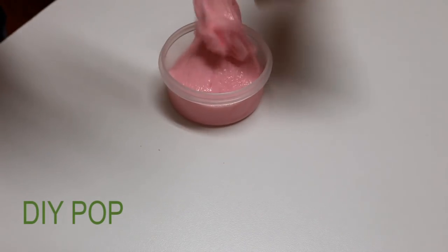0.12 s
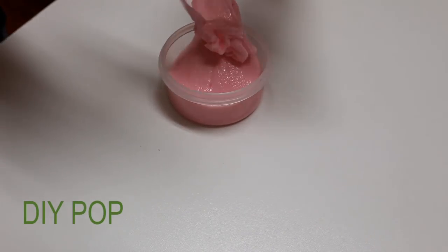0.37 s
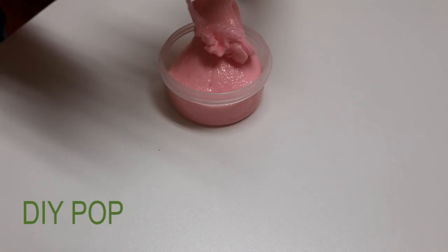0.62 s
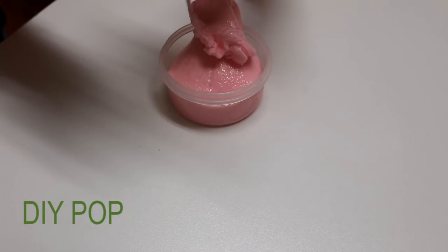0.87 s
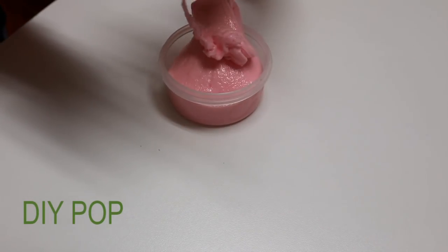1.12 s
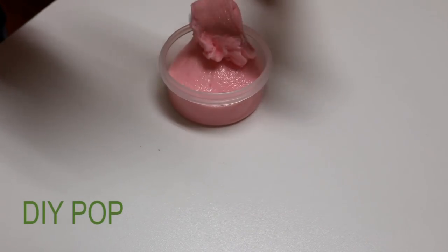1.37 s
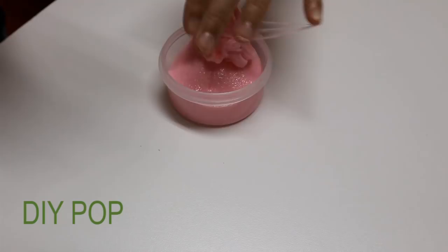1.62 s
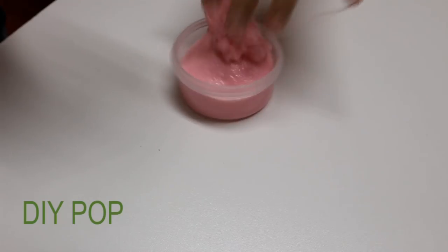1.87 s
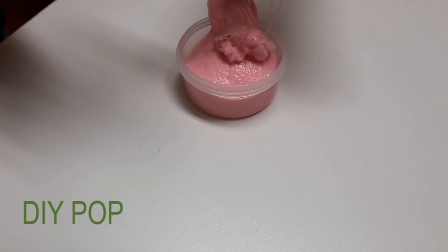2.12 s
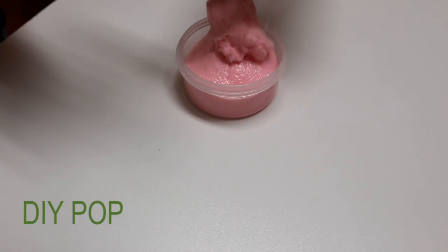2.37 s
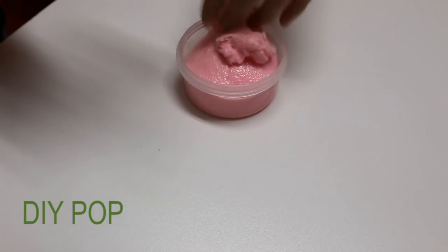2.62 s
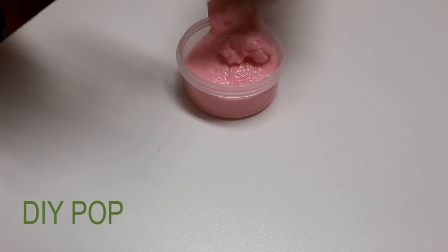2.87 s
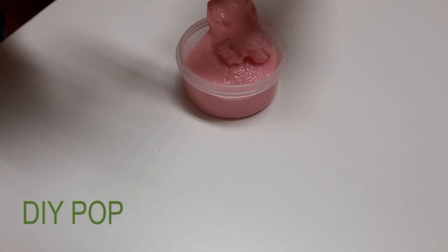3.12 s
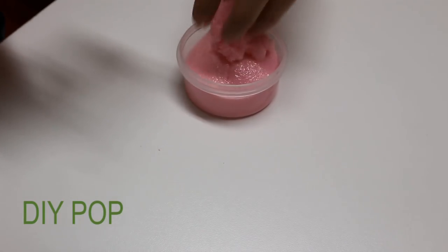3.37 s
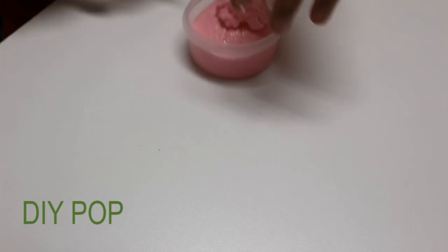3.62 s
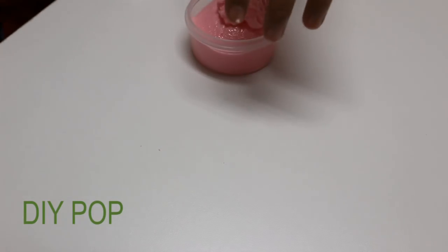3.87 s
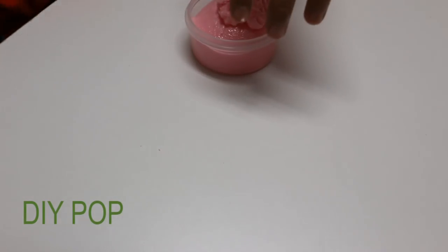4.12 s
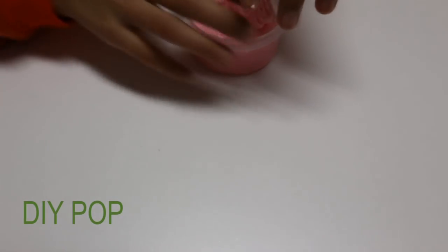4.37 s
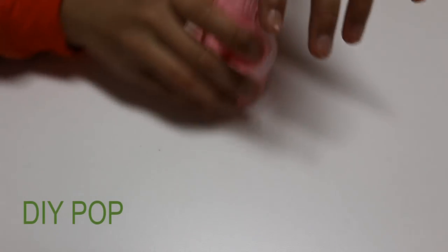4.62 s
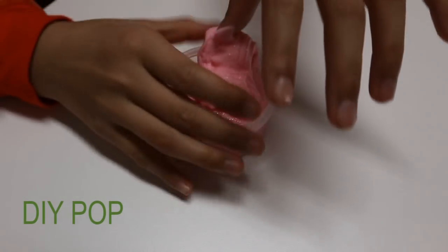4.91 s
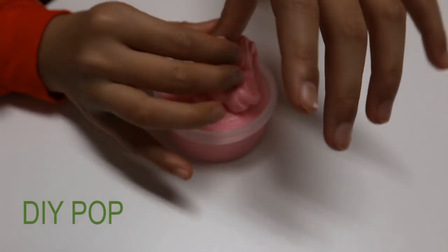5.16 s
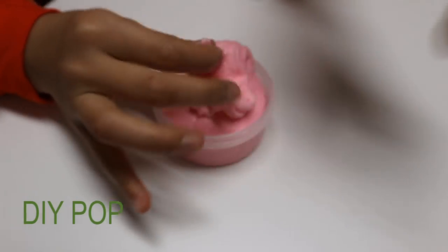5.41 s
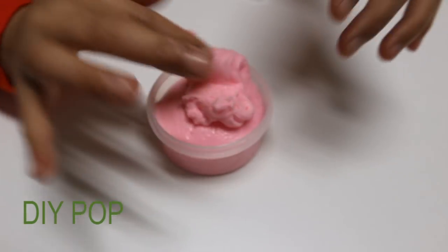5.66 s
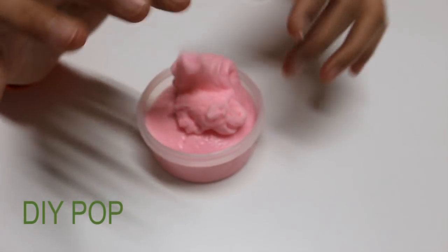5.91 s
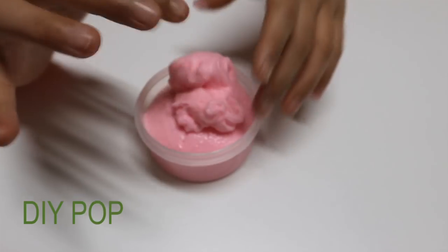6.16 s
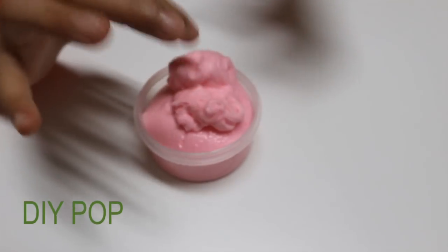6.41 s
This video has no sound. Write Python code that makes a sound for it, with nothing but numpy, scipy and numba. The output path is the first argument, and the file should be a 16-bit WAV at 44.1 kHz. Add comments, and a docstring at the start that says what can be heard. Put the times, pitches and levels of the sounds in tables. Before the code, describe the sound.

Soft slime clicks and little air-pocket pops come in loose clusters, with brief airy squeaks. One sharp plastic thud on a hard table stands out, then near quiet. A gritty drag leads into the loudest moment, fat hollow pops within a stuttering creak that slows into single slips. More scraping and bumps follow, then light sticky pops. Close dry stereo pickup, small quiet room, low hum.

```python
"""Fingers knead fluffy slime in a plastic tub on a hard table, close to a small stereo microphone.
Pops are film snaps with ringing air pockets; sticky films are dense bright clicks, squeaks ringing noise.
The tub knocks and slides on the table as grit and blows ring its modes, and once judders with a creak.
A quiet room hums behind: coloured noise, narrow wavering bands and a distant low rumble."""
import sys
import numpy as np
from scipy import signal
from scipy.fft import rfft, irfft, next_fast_len
from scipy.io import wavfile
from scipy.ndimage import uniform_filter1d
from numba import njit

SR = 44100
rng = np.random.default_rng(int(sys.argv[2]) if len(sys.argv) > 2 else 0)


def voltage_ratio(level):
    """Linear amplitude factor for a level in decibels (scalar or array-like)."""
    return 10 ** (np.asarray(level, float) / 20)


def put_to_file(sound):
    """Save the sound as 16-bit audio at rate SR, in the file named by the first command-line argument."""
    columns = np.atleast_2d(sound).T  # one column per channel
    safe = np.clip(columns, -1, 1)
    whole_steps = np.round(safe * 32767)
    wavfile.write(sys.argv[1], SR, whole_steps.astype(np.int16))


N = 287532
T = np.arange(N) / SR
SIZE = next_fast_len(N)  # FFT length

# Resonances of the tub's walls and air. Each row: frequency in Hz, width in Hz, level in dB.
TUB_MODES = [(660, 58, -0.5), (586, 140, -12), (814, 110, -7.5)]
# Resonances of the table top. Each row: frequency in Hz, width in Hz, level in dB.
TABLE_MODES = [(130, 170, -19), (255, 30, -3.5), (419, 130, 3), (472, 110, 1.5)]
# Spectrum of fine crackle. Each row: frequency in Hz, level in dB.
CRACKLE_SPECTRUM = [(2350, -35), (4000, -7), (4190, -13), (5630, 0.5), (8310, -5.5), (13000, -17),
                    (14500, -23), (16000, -29.5)]


def unit(x):
    """Scale to rms 1."""
    return x / np.sqrt(np.mean(x ** 2))


def on_hz(table):
    """A (Hz, value) table on the FFT bins, interpolated along log frequency."""
    hz, value = np.transpose(table)
    bins_hz = np.fft.rfftfreq(SIZE, 1 / SR)
    return np.interp(np.log(bins_hz + 1), np.log(hz + 1), value)


def shape(x, table):
    """Filter a sound by a (Hz, dB) table."""
    return irfft(rfft(x, SIZE) * voltage_ratio(on_hz(table)), SIZE)[:N]


def colour(x, table):
    """Filter a sound by a (Hz, dB) table and bring it to rms 1."""
    return unit(shape(x, table))


def soft(x, hz):
    """A soft contact: the sound rolls off above hz."""
    return signal.sosfilt(signal.butter(2, hz, fs=SR, output="sos"), x)


def above(x, hz):
    """Roll off what lies below hz."""
    return signal.sosfilt(signal.butter(3, hz, "high", fs=SR, output="sos"), x)


def ring(x, modes):
    """Excite a body's modes: a sum of two-pole resonances."""
    return sum(voltage_ratio(db) * signal.lfilter(*signal.iirpeak(hz, hz / width, SR), x) for hz, width, db in modes)


@njit
def moving_band(x, hz, width):
    """State-variable band-pass whose centre moves."""
    y, band, low = np.empty(len(x)), 0., 0.
    for i in range(len(x)):
        g, k = np.tan(np.pi * hz[i] / SR), width / hz[i]
        v = (band + g * (x[i] - low)) / (1 + g * (g + k))
        band, low, y[i] = 2 * v - band, low + 2 * g * v, k * v
    return y


def grit(rate, scatter_db):
    """Dense tiny slips: random clicks, rate per second, some larger than the rest."""
    chance = rng.random((3, N))
    size_db = np.minimum(-scatter_db * np.log(1 - chance[1]), 14)
    return (chance[0] < rate / SR) * voltage_ratio(size_db) * np.sign(chance[2] - .5)


def walk(hz):
    """Random levels held 1 / hz s and slewed twice; rms 1."""
    k = int(SR / hz)
    held = np.repeat(rng.standard_normal(N // k + 1), k)[:N]
    return unit(uniform_filter1d(uniform_filter1d(held, k), k))


def columns(rows):
    """Curve columns on the sample grid; the first column is time in seconds."""
    s, *values = np.transpose(rows)
    return [np.interp(T, s, c) for c in values]


def moving(rows, edge_s=0.011):
    """1 while a motion lasts, easing in and out."""
    on = (T > rows[0][0] - edge_s) & (T < rows[-1][0] + edge_s)
    return uniform_filter1d(on.astype(float), size=600)


def swell(s, db, rise_s, fade_s):
    """Gain that climbs to a peak and fades, straight in decibels: 20 dB per rise_s or fade_s."""
    return voltage_ratio(db - 20 * np.where(T < s, (s - T) / rise_s, (T - s) / fade_s))


def strikes(times, db):
    """One impulse per event."""
    x = np.zeros(N)
    np.add.at(x, (np.asarray(times) * SR).astype(int), voltage_ratio(db))
    return x


def struck(times, db, modes, soft_hz):
    """Soft blows ring a body's modes, each blow scaled to its peak level."""
    one = soft(soft(ring(signal.unit_impulse(2000), modes), soft_hz), soft_hz)
    return signal.oaconvolve(strikes(times, db), one / np.abs(one).max())[:N]


def bursts(times, db, fade_s):
    """A short, exponentially fading puff of noise per event."""
    fade = np.exp(-T[:1000] / fade_s)
    rough = rng.standard_normal((len(times), 1000)) * fade * voltage_ratio(db)[:, None]
    x = np.zeros(N)
    np.add.at(x, (times[:, None] * SR).astype(int) + np.arange(1000), rough)
    return x


def pops():
    """A film snaps and the opened pocket rings roughly for a few cycles, rising as it shrinks."""
    # Each row: start in seconds, pocket peak in dB, pocket pitch in Hz,
    # snap level in dB against the pocket before colouring, pocket 60 dB decay in seconds.
    pop_rows = [(0.1435, -40.5, 1780, -13, 0.013), (0.1735, -46, 1920, -27, 0.018),
                (0.6493, -59, 1770, 1, 0.018), (0.6604, -54, 3220, -14, 0.022),
                (0.6774, -59, 1820, -9, 0.02), (0.6898, -51, 1310, -13, 0.02),
                (0.7465, -36, 1287, -17, 0.039), (0.8875, -42, 2190, -12.5, 0.011),
                (0.9203, -46.5, 2330, -24, 0.02), (1.157, -31.5, 1300, -18, 0.011),
                (1.181, -31, 1374, -21, 0.026), (1.2484, -50, 1380, -14, 0.023),
                (1.2767, -40, 1200, -22, 0.022), (1.282, -38, 1213, -14, 0.049),
                (1.287, -32.5, 1370, -28, 0.028), (1.3863, -42, 1300, -26, 0.022),
                (1.418, -40, 2690, -12, 0.025), (1.4232, -29.5, 2040, -18, 0.01),
                (1.469, -32.5, 1330, -24, 0.016), (1.493, -44, 1350, -19, 0.026),
                (1.725, -49.5, 2910, -9, 0.013), (1.7584, -48, 2900, -12.5, 0.016),
                (2.383, -49, 2250, -21, 0.025), (2.6494, -45.5, 2224, -21, 0.012),
                (2.7297, -42.5, 2310, -19, 0.034), (3.0632, -46.5, 2400, -27, 0.02),
                (3.8812, -11, 1650, -23, 0.023), (3.8938, -13, 1495, -33, 0.024),
                (3.9867, -28, 1450, -37, 0.012), (4.017, -16, 1510, -44, 0.013),
                (4.041, -19, 1430, -42, 0.026), (4.069, -23, 1350, -33, 0.017),
                (4.0883, -11.5, 1592, -12.5, 0.02), (4.1067, -12, 1170, -28, 0.053),
                (4.1128, -2.5, 1230, -33.5, 0.023), (4.1158, -11, 1354, -28.5, 0.022),
                (5.364, -46, 2100, -16, 0.016), (5.3772, -42, 2050, -15.5, 0.012),
                (5.457, -37, 1370, -14, 0.021), (5.5054, -39, 1300, -27, 0.02),
                (5.9024, -45.5, 1620, -10.5, 0.02), (5.913, -44, 1680, -17, 0.023),
                (6.1976, -44.5, 2140, -17, 0.02), (6.4332, -42.5, 2460, -26, 0.018)]
    # Tone of a tearing film. Each row: frequency in Hz, gain in dB.
    snap_tone = [(2500, 0), (4500, -1), (8500, 11), (11000, 3.5), (14000, -6), (16500, -31)]
    out, t = np.zeros(N), T[:2000]
    for s, db, hz, _, t60 in pop_rows:
        t60 = np.clip(t60, .003, .08)
        # long pops open slowly, short ones snap
        opening = 1 - np.exp(-t / (0.027 * t60))
        fade = opening * np.exp(-np.log(1000) * t / t60)
        # the tearing mouth of the pocket flutters, spreading the ring upwards
        flutter = ring(rng.standard_normal(len(t)), [(1.25 * hz, 900, -3), (1.8 * hz, 900, -2)])
        tone = np.sin(2 * np.pi * hz * t * (.99 + 2.5 * t))
        pocket = fade * (tone + 2.7 * soft(flutter, 3100))
        i = int(s * SR)
        out[i:i + len(t)] += voltage_ratio(db) * pocket / np.abs(pocket).max()
    s, db, _, snap_db, _ = np.transpose(pop_rows)
    big = db > -30  # these tear thicker, duller films
    thin, thick = (shape(bursts(s[k], (db + snap_db)[k], fade_s=0.0027), snap_tone) for k in (~big, big))
    return out + thin + soft(thick, 9200)


def films():
    """Sticky films tear in fine bright crackle as fingers pull away."""
    # Each row: peak time in seconds, level in dB, seconds to rise 20 dB, seconds to fade 20 dB.
    tears = [(0.01, -62, 0.05, 0.06), (0.148, -62, 0.04, 0.09), (0.746, -65, 0.03, 0.08),
             (1.178, -64.5, 0.02, 0.12), (1.282, -73, 0.08, 0.12), (1.556, -70, 0.1, 0.03),
             (1.72, -67, 0.035, 0.12), (1.87, -61, 0.03, 0.15), (2.4, -63, 0.03, 0.07),
             (2.742, -62, 0.06, 0.05), (3.062, -66.5, 0.05, 0.07), (3.4, -72, 0.1, 0.1),
             (4.61, -58, 0.03, 0.05), (5.384, -69, 0.1, 0.04), (5.462, -62, 0.04, 0.02),
             (5.514, -59, 0.06, 0.09), (5.906, -58.5, 0.025, 0.045), (6.2, -66, 0.1, 0.03),
             (6.425, -69, 0.03, 0.07)]
    return sum(swell(*row) for row in tears) * colour(grit(rate=2700, scatter_db=2.5), CRACKLE_SPECTRUM)


def squeaks():
    """Air leaving a pocket hisses through a narrow neck and rings roughly at one pitch."""
    # Each row: peak time in seconds, level in dB, seconds to fade 20 dB, pitch in Hz.
    leaks = [(0.75, -44, 0.028, 1320), (1.31, -57, 0.1, 1430), (1.58, -58, 0.3, 1020)]
    rise_s, width_hz = 0.01, 90
    leak = rng.standard_normal(N)
    return sum(swell(s, db, rise_s, fade_s) * unit(ring(leak, [(hz, width_hz, 0)]))
               for s, db, fade_s, hz in leaks)


def knocks():
    """The base lands on one edge, then the other; tub and table ring, with a brief crack on top."""
    # Each row: start in seconds, peak of each edge's tub ring in dB,
    # table in dB and crack before colouring in dB, both against the tub.
    landings = [(1.857, -47, 6.5, -7), (1.874, -42.5, 11.5, -2), (1.911, -28, 6, -14.5),
                (1.9406, -2, -5, -17.5), (2.426, -41.5, 4.5, -10), (2.716, -34, -14.5, -18),
                (3.413, -47, 6.5, -2.5), (3.427, -27.5, -0.5, -19), (3.491, -35.5, -5.5, -19),
                (3.5, -39.5, -0.5, -9), (3.53, -35.5, 9.5, -15), (3.574, -24, -16.5, -17),
                (4.546, -30.5, -15.5, -12), (4.553, -22, -12.5, -24), (4.732, -20, -10.5, -11),
                (4.75, -18, -12.5, -16), (5.519, -28.5, -4.5, -10)]
    # Tone of the crack. Each row: frequency in Hz, gain in dB.
    crack_tone = [(900, -6), (1400, 14.5), (2500, 13), (4000, -1.5), (8000, -8.5), (12000, -18),
                  (16000, -34)]
    rock_s = 0.00152  # delay of the second edge
    s, db, table_db, crack_db = np.transpose(landings)
    # a hand on the tub widens its modes
    held = [(hz, 2.7 * width, level) for hz, width, level in TUB_MODES]
    tub = struck(s, db, held, 1460) + struck(s + rock_s, db, held, 1280)
    table = struck(s, db + table_db, TABLE_MODES, 800)
    crack = shape(bursts(s + rock_s, db + crack_db, fade_s=0.0018), crack_tone)
    return tub + table + crack


def slides():
    """Grit under the base rings tub, walls and table, in drags and brief nudges."""
    # One curve a drag. Each row: time in seconds, rub level in dB, upper wall modes in dB against the tub.
    drags = [
        [(1.84, -66, 0), (1.865, -46, 2), (1.92, -39, 1), (1.936, -27, -8), (1.956, -34, -2), (1.968, -39, 4),
         (2.036, -53, 4), (2.2, -78, -4)],
        [(3.46, -63, 0), (3.508, -43, -2), (3.585, -25.5, -5), (3.66, -25.5, -5), (3.71, -33, -2.5),
         (3.82, -64, 0)],
        [(4.53, -66, -5), (4.546, -31, -9), (4.614, -32, 0), (4.684, -26.5, 0), (4.71, -30, 0),
         (4.732, -26, -2), (4.824, -33, -1), (4.95, -61, -2), (5.0, -60, -5)],
        [(5.416, -62, -8), (5.468, -41, -3), (5.514, -37, -4.5), (5.66, -73.5, -4)],
        [(5.76, -69, -3), (5.81, -51.5, -9), (5.874, -50, -3), (5.906, -41, -8), (6.0, -66, -5)],
    ]
    # What each drag also sets off. Each row: table in dB, base hiss before softening in dB, against the tub.
    drag_load = [(3, -36), (-6.5, -33), (-13, -27), (-1, -36), (-1, -36)]
    # Brief nudges. Each row: peak time in seconds, rub level in dB, seconds to fade 20 dB,
    # table in dB, upper wall modes in dB, both against the tub.
    nudges = [(0.172, -45, 0.035, 1, -2), (0.778, -60, 0.04, 4, 0), (1.185, -55, 0.07, 0, 2),
              (1.72, -64, 0.08, 4, 2), (2.43, -52, 0.045, 3, -1.5), (2.5, -61, 0.3, 0, 4),
              (2.88, -64, 0.2, 2, 6), (2.716, -50, 0.12, -4, -4), (3.05, -57, 0.08, 2, -2),
              (3.09, -61, 0.04, 1, 2.5), (3.42, -47, 0.05, -4, -5), (5.745, -54, 0.03, 8, -8),
              (6.205, -41, 0.03, -4, -4), (6.444, -51, 0.05, -2.5, -2)]
    # Spectrum of the upper wall modes. Each row: frequency in Hz, level in dB.
    wall_spectrum = [(520, -35), (880, -3.5), (955, -0.5), (1120, -1.5), (1250, -5.5), (2370, -14.5),
                     (3850, -31), (4170, -46), (4500, -34), (5850, -62), (9900, -120)]
    moves = []
    for rows, (table_db, hiss_db) in zip(drags, drag_load):
        db, wall_db = columns(rows)
        moves.append((moving(rows) * voltage_ratio(db), table_db, wall_db, hiss_db))
    for s, db, fade_s, table_db, wall_db in nudges:
        moves.append((swell(s, db, 0.6 * fade_s, fade_s), table_db, wall_db, -30))
    rub = grit(rate=1300, scatter_db=1.0)
    grip = voltage_ratio(1 * walk(hz=60))  # the grip catches and lets go: random, 1 dB rms
    tub = unit(soft(ring(rub, TUB_MODES), 1160))
    wall = colour(rub, wall_spectrum)
    table = unit(soft(ring(rub, TABLE_MODES), 600))
    hiss = colour(grit(rate=2700, scatter_db=2.0), CRACKLE_SPECTRUM)
    hiss = soft(soft(hiss, 12000), 12000)
    return grip * sum(gain * (tub + voltage_ratio(table_db) * table + voltage_ratio(wall_db) * wall + voltage_ratio(hiss_db) * hiss)
                      for gain, table_db, wall_db, hiss_db in moves)


def creak():
    """Fast stick-slip under the pressed tub, trailing off into single slips."""
    # Each row: time in seconds, rub in dB, squeak in dB, squeak resonance in Hz, low rub in dB, hiss in dB.
    creak_curve = [(3.9, -36, -29, 1520, -43, -52), (3.944, -43, -39, 1540, -44, -65),
                   (3.994, -35.5, -24.5, 1490, -54, -56), (4.066, -27, -23.5, 1320, -46, -54),
                   (4.085, -26, -25, 1350, -48, -46.5), (4.135, -30, -35, 1490, -46, -46),
                   (4.193, -34, -34.5, 1350, -42, -58), (4.307, -52, -52.5, 1460, -54, -78)]
    # Body modes of the dull rub. Each row: frequency in Hz, width in Hz, level in dB.
    body_modes = [(834, 98, -1.5), (970, 120, -2.5)]
    # Modes of the low rub. Each row: frequency in Hz, width in Hz, level in dB.
    low_modes = [(110, 80, -7.5), (310, 100, 2), (516, 29, -5.5)]
    # Spectrum of the upper rub. Each row: frequency in Hz, level in dB.
    top_spectrum = [(1000, -35), (1700, -4.5), (2360, -2.5), (2950, -2.5), (3140, -10), (3480, -12),
                    (4800, -28), (6240, -58), (10600, -120)]
    # Spectrum of the hiss. Each row: frequency in Hz, level in dB.
    hiss_spectrum = [(2650, -34), (4500, 0.5), (7690, -5), (8690, -3.5), (11400, -34), (12600, -44),
                     (13900, -31), (16000, -39)]
    # Last single slips. Each row: start in seconds, peak in dB.
    slips = [(4.179, -14), (4.196, -14), (4.228, -16.5), (4.258, -22), (4.284, -27.5), (4.317, -25.5),
             (4.343, -26), (4.366, -30), (4.384, -30), (4.402, -37), (4.415, -35), (4.442, -40)]
    # Modes rung by those slips. Each row: frequency in Hz, width in Hz, level in dB.
    slip_modes = [(900, 90, 5), (1350, 680, 2), (1950, 350, -4.5), (2900, 390, -7)]
    db, squeak_db, hz, low_db, hiss_db = columns(creak_curve)
    rub = grit(rate=1500, scatter_db=1.0)
    squeak = voltage_ratio(squeak_db) * unit(moving_band(moving_band(rub, hz, 450.), hz, 170.))
    dull = unit(soft(ring(rub, body_modes), 2100))
    low = voltage_ratio(low_db) * unit(soft(ring(rub, low_modes), 600))
    top = voltage_ratio(-1.5) * colour(rub, top_spectrum)
    hiss = voltage_ratio(hiss_db) * colour(rub, hiss_spectrum)
    judder = voltage_ratio(1.2 * walk(hz=90))  # the creak breaks up: random, 1.2 dB rms
    fast = moving(creak_curve) * judder * (squeak + low + hiss + voltage_ratio(db) * (dull + top))
    return fast + struck(*np.transpose(slips), slip_modes, 2000)


def room(x):
    """Bright scatter off hands and table, unlike at each capsule, and a short dull tail."""
    t60_s, tail_db = 0.32, -19
    scatter_s, scatter_db = .004, -9.5  # scatter level before its bass is cut
    t = T[:SR // 2]
    noise = rng.standard_normal((5, len(t)))
    decay = np.exp(-np.log(1000) * t / t60_s) * (t > .004)
    # the tail is mostly common to both capsules
    tail = soft((noise[0] + 0.22 * noise[1:3]) * decay, 1960)
    tail /= np.sqrt(np.sum(tail[0] ** 2))
    scatter = noise[3:] * np.exp(-t / scatter_s)
    scatter /= np.sqrt(np.sum(scatter[0] ** 2))
    both = voltage_ratio(tail_db) * tail + voltage_ratio(scatter_db) * above(scatter, 2600)
    return signal.oaconvolve(x[None], both, axes=1)[:, :N]


def capsules(near):
    """Opposite phase shifts, left lagging and right leading, and a slight level lean set the two sides."""
    # Difference between the capsules. Each row: frequency in Hz, side minus mid in dB.
    ports = [(60, -16.5), (110, -14), (200, -22.5), (380, -24), (700, -24), (1290, -12), (2380, -9.5),
             (4400, 5.5), (8120, -0.5), (15000, 6)]
    # Level lean. Each row: frequency in Hz, left minus right in dB.
    lean_table = [(60, -1.5), (110, 0.0), (200, -0.5), (380, -1), (700, 0.5), (1290, 0.5), (2380, 0),
                  (4400, -0.5), (8120, 3), (15000, -1.5)]
    late = 1j * voltage_ratio(on_hz(ports))
    lean = voltage_ratio(on_hz(lean_table) / 2)
    return irfft(rfft(near, SIZE) * np.array([(1 - late) * lean, (1 + late) / lean]), SIZE)[:, :N]


def air():
    """Room noise, mostly alike in the bass and opposed in the treble, with a wavering narrow-band hum."""
    # Spectrum of the part alike on both sides. Each row: frequency in Hz, level in dB.
    mid_spectrum = [(29, -36.5), (50, -7), (106, -0.5), (189, -4), (461, -7.5), (532, -12.5), (842, -13.5),
                    (1120, -18), (2440, -23.5), (3030, -21.5), (3850, -30), (8540, -40), (10900, -49.5),
                    (12300, -67), (16000, -71)]
    # Spectrum of the part opposed between the sides. Each row: frequency in Hz, level in dB.
    side_spectrum = [(12, -59.5), (20, -39), (107, -7), (262, -2.5), (434, -4.5), (527, -4.5), (849, -6),
                     (923, -7), (3070, -12.5), (12100, -32), (16000, -55)]
    # Hum bands. Each row: frequency in Hz, width in Hz, level in dB rms.
    hum_bands = [(100.7, 29, -66), (243.4, 3.3, -61.5), (295.7, 3.7, -60.5), (350.3, 10, -72.5),
                 (475.5, 14, -69)]
    mid = voltage_ratio(-54.5) * colour(rng.standard_normal(N), mid_spectrum)
    for hz, width, db in hum_bands:
        mid += voltage_ratio(db) * unit(ring(rng.standard_normal(N), [(hz, width, 0)]))
    side = voltage_ratio(-57.5) * colour(rng.standard_normal(N), side_spectrum)
    return np.array([mid + side, mid - side])


def rumble():
    """Distant low rumble: noise below about 45 Hz at a slowly changing level."""
    # Each row: time in seconds, level in dB.
    rumble_curve = [(0, -69), (1.4, -66), (2.7, -59), (4.4, -63), (6.52, -63)]
    return voltage_ratio(columns(rumble_curve)[0]) * unit(soft(soft(rng.standard_normal(N), 45), 45))


def scene():
    """Slime and tub at the two capsules, with their reflections, over the quiet room."""
    near = pops() + films() + squeaks() + knocks() + slides() + creak()
    near = above(near, 90)
    return capsules(near) + room(near) + air() + rumble()


def low_pass(x):
    """Removes everything above the highest recorded frequency."""
    return signal.sosfilt(signal.butter(12, 16470, fs=SR, output="sos"), x)


def record(dry):
    """The microphone rolls off the top and peaks are limited to full scale."""
    mix = np.clip(soft(dry, 12100), -1, 1)
    return low_pass(mix)


dry = scene()
out = record(dry)
put_to_file(out)
```